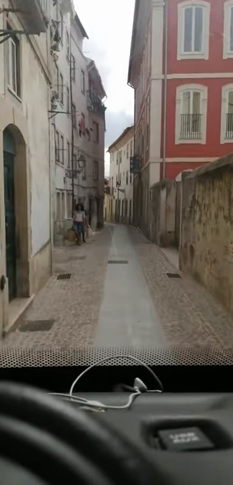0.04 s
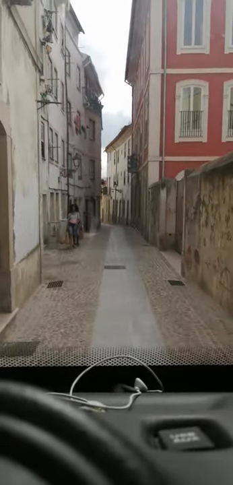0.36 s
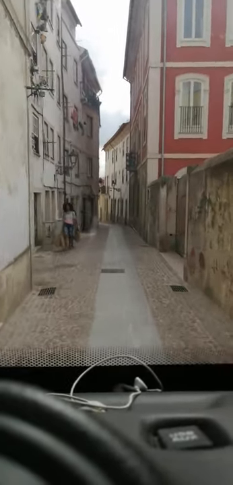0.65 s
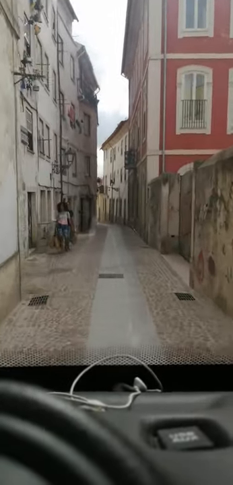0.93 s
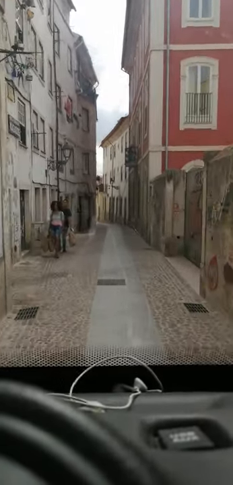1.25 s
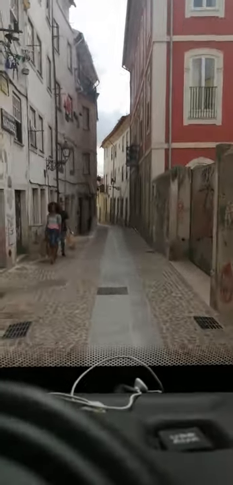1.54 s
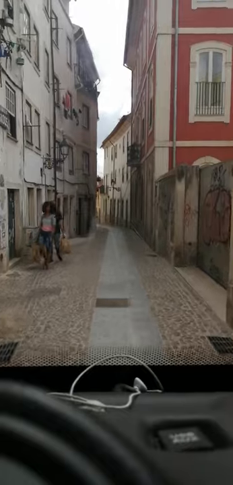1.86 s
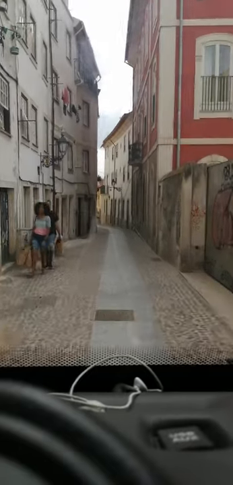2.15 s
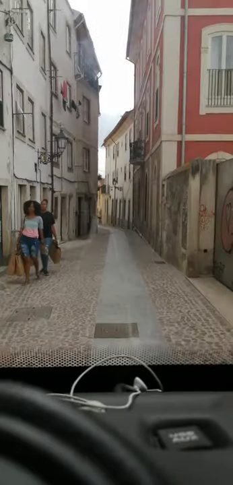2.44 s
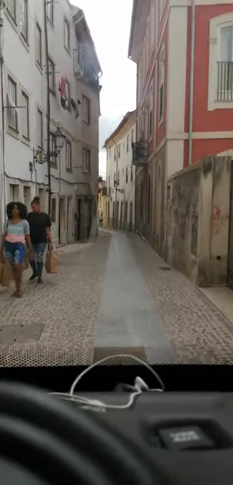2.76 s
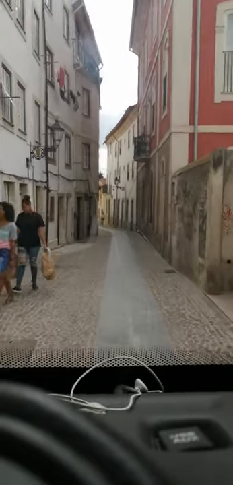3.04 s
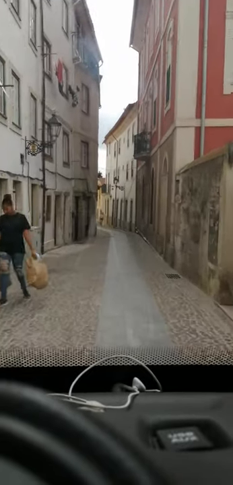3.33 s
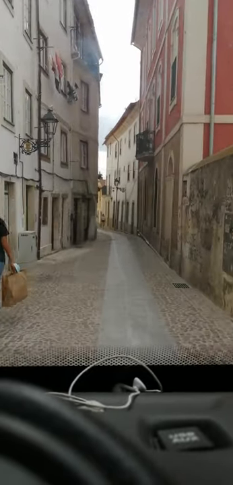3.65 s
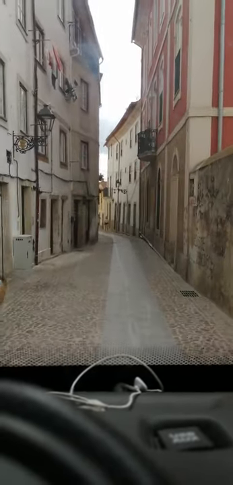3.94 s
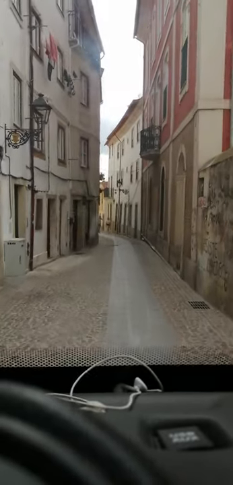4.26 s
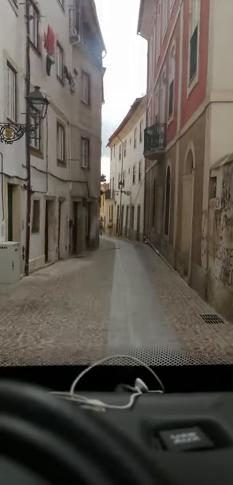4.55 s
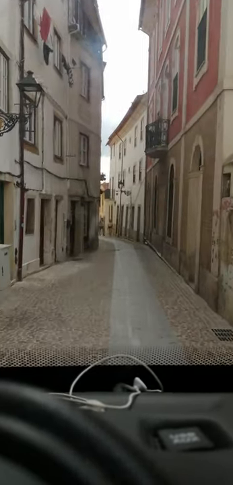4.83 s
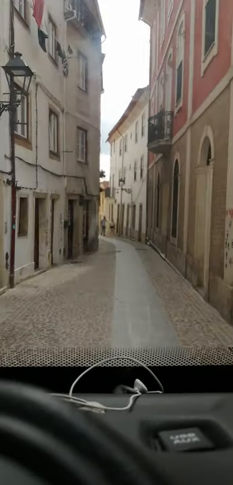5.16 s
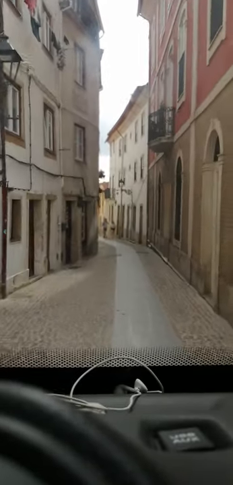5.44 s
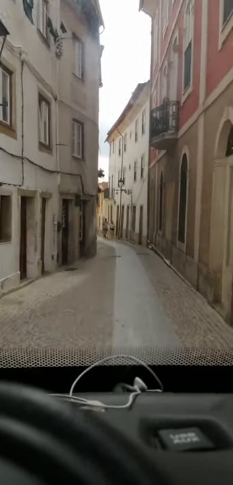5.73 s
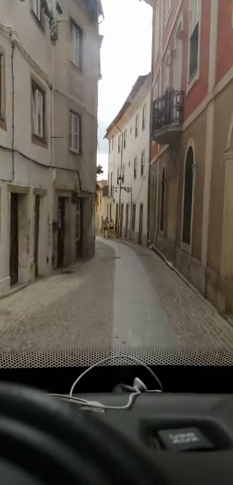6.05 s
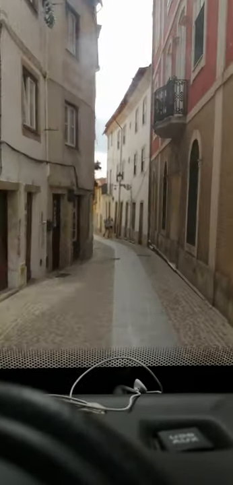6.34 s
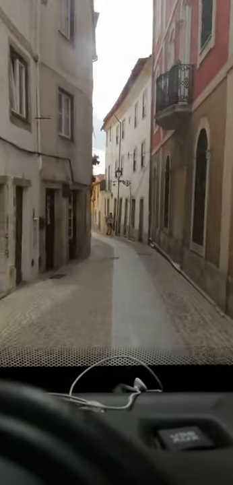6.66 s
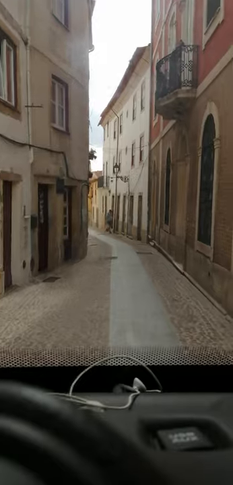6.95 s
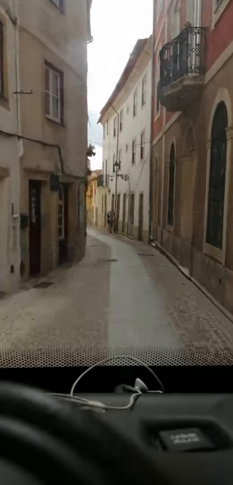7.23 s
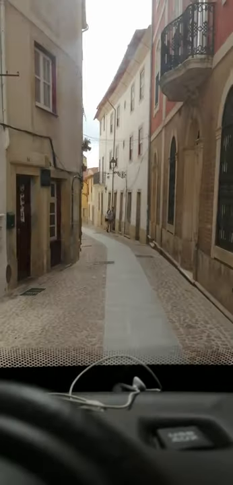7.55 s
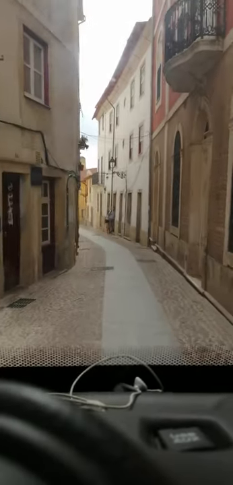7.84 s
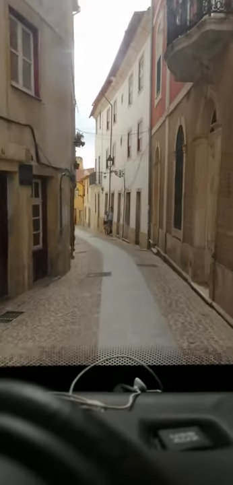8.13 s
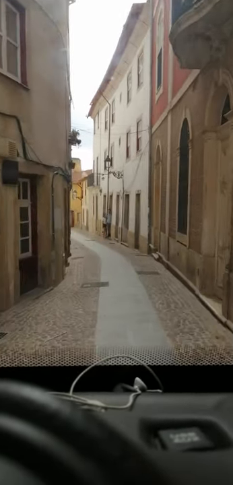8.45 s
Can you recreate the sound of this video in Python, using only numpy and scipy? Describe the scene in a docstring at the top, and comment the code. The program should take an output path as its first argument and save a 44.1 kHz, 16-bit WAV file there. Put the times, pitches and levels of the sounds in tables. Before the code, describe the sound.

Heard from the dashboard inside a small electric bus, cobblestones drone under the tyres and boom through the floor at a slow, steady pace. Close by, plastic panels click and rattle, harder with each jolt, and a little metal part clinks irregularly. A few short, high squeaks come before the middle, followed by a heavy low heave with a faint, thin scrape. The rattling carries on, with one more squeak late.

```python
"""Inside a small electric bus, rolling slowly over cobbles in a narrow lane.
The stones rock the body, boom in the floor and ring the cabin: a deep, uneven bed of rumble.
Over it a dry joint squeaks now and then, hard edges scrape and a small metal fitting jingles.
Up front, plastic trim knocks and each jolt sets the loose panels chattering."""
import sys
import numpy as np
from scipy import signal
from scipy.fft import rfft, irfft
from scipy.io import wavfile
from scipy.ndimage import uniform_filter1d, minimum_filter1d

SR = 44100
rng = np.random.default_rng(int(sys.argv[2]) if len(sys.argv) > 2 else 0)


def log_audio(samples):
    """Write samples as a 16-bit WAV file to the path given in sys.argv[1]."""
    # one column per channel
    frames = np.atleast_2d(samples).T
    # limit to full scale, then quantise
    limited = np.clip(frames, -1, 1)
    pcm = np.round(limited * 32767).astype(np.int16)
    wavfile.write(sys.argv[1], SR, pcm)


N = 374409
T = np.arange(N) / SR

# Roughness of the paving. Each row: time in seconds, relative level in dB.
ROAD = [(0.0, -35), (0.85, -36.5), (1.05, -34), (1.14, -41), (1.3, -35), (1.95, -35), (2.72, -37.5),
        (2.95, -34.5), (4.0, -38), (4.38, -36), (4.58, -40.5), (4.8, -33.5), (5.14, -36.5), (5.7, -40),
        (6.12, -45), (6.62, -37), (7.08, -39), (7.25, -34), (7.72, -35), (7.83, -36), (7.95, -33.5),
        (8.45, -38)]
# The cabin's low ring. Each row: time in seconds, level in dB.
CABIN_RING = [(0, -41), (0.17, -35.5), (0.38, -43.5), (0.65, -42), (0.85, -35), (1.03, -39.5), (1.2, -47),
              (1.5, -39), (1.85, -36), (2.1, -38), (2.3, -42), (2.47, -37), (2.65, -52), (2.87, -38),
              (3.3, -39), (3.55, -44), (3.75, -39.5), (4.08, -47.5), (4.4, -36.5), (4.6, -44.5),
              (4.87, -36.5), (5.12, -47.5), (5.3, -39), (5.55, -45), (5.85, -41), (6.15, -49), (6.3, -42.5),
              (6.85, -47), (7.05, -45), (7.25, -40.5), (7.65, -37), (7.85, -43.5), (8.03, -37.5),
              (8.2, -42), (8.45, -42.5)]
# Swells in the low end: the body heaving, the floor thudding, a hollow part thumping, a large panel
# ringing. Each row: crest in seconds, rise in seconds, level in dB.
BODY_HEAVES = [(0.05, 0.019, -15.5), (0.32, 0.14, -16), (0.96, 0.041, -16), (1.58, 0.033, -9.5),
               (2.37, 0.035, -15), (2.98, 0.011, -10), (3.33, 0.08, -16.5), (3.57, 0.054, -15),
               (3.87, 0.054, -12.5), (4.02, 0.01, -3.5), (4.3, 0.062, -13), (4.93, 0.016, -8),
               (5.55, 0.22, -18.5), (6.33, 0.47, -16.5), (6.63, 0.051, -16.5), (6.93, 0.069, -17),
               (7.92, 0.055, -14.5), (8.38, 0.08, -12.5)]
FLOOR_THUDS = [(0.13, 0.093, -23), (0.65, 0.078, -25), (2.52, 0.037, -27.5), (3.2, 0.05, -29),
               (4.0, 0.031, -27), (4.45, 0.026, -20.5), (4.58, 0.036, -21.5), (4.83, 0.11, -24.5),
               (5.2, 0.014, -26.5), (5.8, 0.032, -23), (6.15, 0.19, -27.5), (7.33, 0.032, -29),
               (7.55, 0.052, -24.5), (8.09, 0.04, -29)]
THUMPS = [(2.41, 0.062, -41.5), (2.83, 0.019, -31.5), (5.78, 0.022, -32.5)]
HOLLOW_SWELLS = [(0.23, 0.051, -37), (0.8, 0.035, -43), (1.56, 0.03, -38.5), (1.85, 0.035, -37),
                 (2.25, 0.021, -44.5), (2.48, 0.027, -41), (2.87, 0.047, -43), (3.35, 0.051, -38.5),
                 (3.73, 0.061, -44), (5.25, 0.051, -45), (7.2, 0.039, -42), (7.64, 0.049, -40.5),
                 (8.01, 0.05, -37.5)]
# Bumps under the wheels. Each row: crest in seconds, rise in seconds, panel shake and metal shake
# in relative dB.
BUMPS = [(0.02, 0.036, -50, -51), (0.23, 0.071, -42.5, -50), (0.39, 0.098, -46, -59),
         (0.6, 0.15, -54.5, -64), (0.82, 0.025, -44, -66), (1.01, 0.051, -49.5, -63),
         (1.41, 0.022, -45, -90), (1.585, 0.021, -42, -54.5), (1.74, 0.071, -51.5, -55.5),
         (1.905, 0.048, -43.5, -49), (2.25, 0.037, -49, -61.5), (2.475, 0.042, -45, -51),
         (2.65, 0.023, -47, -53), (2.89, 0.026, -40, -50.5), (2.97, 0.033, -42.5, -48.5),
         (3.09, 0.053, -42.5, -51.5), (3.3, 0.012, -36.5, -45.5), (3.4, 0.064, -42.5, -50),
         (3.465, 0.012, -51.5, -57), (3.55, 0.0074, -45, -50), (3.765, 0.09, -40.5, -52),
         (4.02, 0.051, -45.5, -51.5), (4.135, 0.038, -71, -50.5), (4.245, 0.013, -42.5, -54),
         (4.32, 0.03, -48, -59.5), (4.455, 0.029, -42, -54.5), (4.85, 0.039, -44.5, -60),
         (4.95, 0.05, -57, -64), (5.27, 0.07, -43, -74), (5.36, 0.038, -55, -51), (5.57, 0.091, -49, -59),
         (5.81, 0.14, -42.5, -52), (6.02, 0.052, -55, -73), (6.21, 0.065, -47, -61),
         (6.36, 0.12, -52.5, -61), (6.55, 0.039, -62, -55.5), (6.71, 0.078, -47, -53.5),
         (6.97, 0.046, -47, -59), (7.18, 0.053, -45.5, -53.5), (7.37, 0.15, -52, -60),
         (7.665, 0.044, -39, -46.5), (8.05, 0.076, -41, -50), (8.24, 0.039, -48.5, -62),
         (8.38, 0.044, -44, -56)]
# Thin scrapes. Each row: start in seconds, relative peak in dB.
SCRAPES = [(4.002, -48), (4.07, -60), (5.69, -58)]
# Squeaks of the joint. Each row: start and length in seconds, pitch in Hz, level in dB,
# overtone slope in dB per octave, roughness from 0 to 1.
SQUEAKS = [(2.681, .03, 1810, -38, -10, .72), (2.708, .075, 1790, -48.5, -8.5, .85),
           (3.06, .05, 1840, -44.5, -12, .55), (3.279, .032, 1780, -45, -13, .55),
           (7.32, .018, 2880, -40, -9, .85), (7.338, .05, 2880, -57, -4, .85)]
# Notes left ringing in the fitting. Each row: start in seconds, pitch in Hz, level in dB,
# seconds to fade by 60 dB.
PINGS = [(2.616, 4730, -56, .25), (3.555, 4375, -47, .07), (3.651, 4375, -51, .06), (8.212, 6024, -62, .45)]
# Clashes of the fitting. Each row: start in seconds, then ticks, low clink and high clink in relative dB.
CLASHES = [(0.361, -50.5, -65.5, -51), (2.417, -43.5, -43.5, -50), (2.614, -43, -47, -42.5),
           (2.777, -52.5, -46, -67), (2.836, -46.5, -54, -54), (3.108, -48.5, -54, -52),
           (3.287, -44, -45, -48), (3.46, -50.5, -51, -51), (3.554, -49, -43, -55),
           (3.649, -51, -40, -56.5), (3.8467, -49.5, -45, -59), (3.9694, -51, -61, -56),
           (4.13, -42.5, -44, -47), (4.4313, -51.5, -54, -59), (4.7815, -53, -52, -64),
           (5.346, -40, -40, -48), (5.5278, -42, -46, -47), (5.58, -45, -44, -49), (6.151, -48.5, -40, -60),
           (6.207, -60, -54, -58), (6.353, -46.5, -42.5, -49.5), (6.4732, -55, -53, -60),
           (6.675, -44.5, -41, -51), (6.996, -61, -52, -62), (7.1292, -50.5, -50, -57),
           (7.2739, -46, -49, -45), (7.384, -54, -57, -57), (7.5567, -41, -46, -49),
           (8.208, -38.5, -44, -43.5)]
# Knocks of the trim. Each row: start in seconds, push and hard edge in relative dB.
KNOCKS = [(0.087, -26.5, -43), (0.126, -36, -43.5), (0.218, -30, -40), (0.234, -31, -47),
          (0.257, -24.5, -39), (0.274, -27, -43), (0.501, -31, -58), (0.668, -33, -45), (0.717, -32, -52),
          (0.726, -32, -51), (0.844, -32, -53), (0.956, -30, -61), (0.973, -23, -40), (1.163, -34, -50),
          (1.201, -27.5, -44), (1.207, -39, -49.5), (1.253, -33, -57), (1.366, -30, -58), (1.519, -44, -43),
          (1.57, -24, -55), (1.588, -33, -40), (1.599, -26, -55), (1.611, -25, -51), (1.677, -28, -45),
          (1.724, -33, -45), (1.744, -39, -49), (1.777, -24, -47), (1.859, -20.5, -50), (1.92, -33, -37),
          (1.958, -35, -47), (2.21, -31, -64), (2.249, -31, -54), (2.264, -28, -47), (2.303, -29.5, -49),
          (2.375, -32, -51), (2.625, -31.5, -53), (2.7, -32, -59), (2.816, -27, -47), (2.831, -21.5, -37),
          (2.842, -21, -39), (2.861, -27, -53), (3.059, -41, -51), (3.164, -30.5, -46), (3.243, -32.5, -57),
          (3.394, -29, -49), (3.571, -27.5, -48), (3.75, -37, -44), (3.775, -27, -45), (3.784, -22.5, -39),
          (3.799, -33, -47), (4.11, -37, -43.5), (4.24, -32, -56), (4.263, -34, -57), (4.33, -30, -53),
          (4.588, -35, -62), (4.613, -44, -56), (4.679, -32, -63), (4.706, -27, -46.5), (4.817, -45, -46),
          (4.833, -36, -50), (4.858, -37, -52), (4.966, -34, -59), (5.021, -35, -67), (5.061, -36, -48),
          (5.103, -38, -57), (5.245, -30, -54), (5.262, -29, -46), (5.287, -48, -49), (5.327, -32, -52),
          (5.812, -31, -50), (5.954, -32, -49), (6.031, -36, -62), (6.231, -38, -57), (6.249, -36, -57),
          (6.574, -36, -60), (6.613, -29, -58), (6.63, -30, -53), (6.74, -37, -50), (6.96, -31, -64),
          (7.165, -31, -53), (7.181, -20.5, -40.5), (7.191, -30, -53), (7.198, -35, -57), (7.227, -25, -53),
          (7.279, -27.5, -60), (7.375, -37, -57), (7.422, -44, -54), (7.467, -32, -52), (7.507, -34, -45),
          (7.537, -27, -51), (7.559, -31, -46), (7.59, -32, -54), (7.779, -35, -51), (7.835, -29.5, -50),
          (7.863, -32, -49), (7.879, -31, -46), (7.907, -32, -58), (8.022, -34, -57), (8.153, -33, -53),
          (8.21, -31, -52), (8.399, -41, -58), (8.441, -42, -45)]
# Jolts that set the panels clattering. Each row: start in seconds, relative peak in dB.
JOLTS = [(0.171, -38), (0.705, -37), (1.774, -32.5), (1.815, -32), (1.862, -37.5), (2.469, -41),
         (2.941, -31.5), (3.042, -35), (3.243, -36), (3.345, -34.5), (3.393, -30), (3.686, -32),
         (3.738, -34), (4.814, -38.5), (5.807, -33.5), (6.276, -40.5), (7.184, -38), (7.466, -39.5),
         (7.615, -33), (7.969, -34), (8.021, -31.5), (8.067, -31.5)]

# The tone colour of each part. Each row: frequency in Hz, gain in dB.
BODY_EQ = [(10, -16), (20, 3.5), (29, -3.5), (40, 2), (47, -3.5), (56, -13), (70, -27), (105, -31),
           (300, -95.5), (3000, -130)]
FLOOR_EQ = [(35, -16.5), (55, -4), (69, 1.5), (82, -11), (105, -8.5), (120, -15), (138, -9), (175, -27.5),
            (300, -34), (3000, -110)]
TYRE_EQ = [(90, -20), (160, 4.5), (185, -1), (235, 2), (275, -5), (345, -11), (410, -13.5), (600, -15),
           (1200, -23), (3000, -38), (8000, -72), (14000, -99)]
SCRAPE_EQ = [(2500, -29), (3250, -2), (3900, -27), (5500, -12), (6200, 2.5), (7200, 0), (8300, -1.5),
             (8900, -18), (14000, -38)]
METAL_EQ = [(1200, -13), (2700, 3), (3400, 0.5), (4300, 0), (4950, -1.5), (5270, -7.5), (5650, -3),
            (6600, -6), (7400, -11.5), (8000, -11.5), (8600, -12.5), (9500, -17.5), (12000, -25.5),
            (15500, -37)]
TRIM_EQ = [(90, -10.5), (270, -7), (700, -5), (1100, 4), (1500, 2.5), (3500, -4.5), (4600, -6),
           (9000, -14.5), (15000, -26)]
PANEL_EQ = [(150, -14.5), (300, 6), (600, 1), (1000, -1), (1400, -3.5), (1550, -5), (2100, -5.5),
            (2350, -11.5), (3100, -12.5), (3500, -18.5), (4800, -18), (5400, -25), (8000, -37),
            (15000, -60.5)]
# The resonances of each part. Each row: pitch in Hz, bandwidth in Hz, gain in dB.
FLOOR_MODE = [(69.5, 3, 0)]
THUMP_MODE = [(222, 60, 0)]
HOLLOW_MODE = [(454, 26, 0)]
CABIN_MODES = [(319.5, 4, 0), (338, 3, 4.5), (349, 9, -4.5), (380, 22, -9.5)]
METAL_MODES = [(4385, 40, 0), (4883, 30, 2), (5635, 30, 4), (6024, 20, 4), (7000, 120, 0), (7442, 50, 5),
               (8480, 90, 0)]
PANEL_MODES = [(355, 14, 0), (457, 22, 7), (530, 14, 2), (678, 14, 0), (792, 16, -1), (992, 28, 2),
               (1105, 30, -1), (1204, 22, 3), (1423, 14, 12.5), (1940, 45, 0), (2540, 90, 1), (2885, 35, 0),
               (3015, 35, 1)]
LOW_CLINK_MODE, HIGH_CLINK_MODE = [(4250, 800, 0)], [(7400, 800, 0)]

USUAL_ROAD_DB, PANEL_SHAKE_DB = -37, -50  # ordinary paving, and the relative shake it gives the panels


def undb(db):
    """Decibels to gain."""
    return 10 ** (np.asarray(db) / 20)


def unit(x):
    """Scale to rms 1."""
    return x / np.sqrt(np.mean(x ** 2))


def add(out, start_s, sound):
    """Mix a short sound in at its cue."""
    part = out[max(int(start_s * SR), 0):][:len(sound)]
    part += sound[:len(part)]


def curve(rows):
    """A fader ride: straight lines between points of time and value."""
    return np.interp(T, *np.transpose(rows))


def lowpass(x, hz, order=2):
    """Roll off the treble."""
    return signal.lfilter(*signal.butter(order, hz, fs=SR), x)


def colour(x, eq, size=16384):
    """Minimum-phase EQ, so nothing rings ahead of an attack."""
    hz, db = np.transpose(eq)
    bins_hz = np.maximum(np.arange(N // 2 + 1) * SR / N, 1)
    gain = undb(np.interp(np.log(bins_hz), np.log(hz), db))
    cepstrum = irfft(np.log(gain), N)
    causal = np.r_[cepstrum[0], 2 * cepstrum[1:size // 2]]
    response = irfft(np.exp(rfft(causal, size)))
    return signal.fftconvolve(x, response[:size // 2])[:N]


def ring(x, modes):
    """Excite resonances side by side."""
    return sum(undb(db) * signal.lfilter(*signal.iirpeak(hz, hz / width, SR), x)
               for hz, width, db in modes)


def impacts(per_s, spread_db):
    """Chance contacts of uneven force and either sign."""
    hit, force = rng.random(N) < per_s / SR, rng.standard_normal(N)
    return unit(hit * np.sign(rng.standard_normal(N)) * undb(spread_db * np.clip(force, -2, 2)))


def steady(x, window_s):
    """Even out the slow swells of a texture, keeping its grain."""
    return x / np.sqrt(uniform_filter1d(x ** 2, int(window_s * SR)) + 1e-12)


def bursts(events, rise_s, fall_s, column=1):
    """Envelope that jumps at each event and dies away."""
    t, out = T[:SR // 2], np.zeros(N)
    shape = (1 - np.exp(-t / rise_s)) * np.exp(-t / fall_s)
    for row in events:
        add(out, row[0], undb(row[column]) * shape / shape.max())
    return out


def swells(events, column=2, fall_per_rise=1.4):
    """Envelope of bell-shaped swells that fade more slowly than they build; their powers add."""
    t, power = T[::100], 0
    for row in events:
        age = t - row[0]
        width = row[1] * np.where(age < 0, 1, fall_per_rise)
        power = power + undb(row[column]) ** 2 * np.exp(-(age / width) ** 2)
    return np.interp(T, t, np.sqrt(power))


def shake(steady_db, envelope, sensitivity):
    """How hard a part is shaken: by the paving (sensitivity in dB per dB) and by its own swells."""
    return np.hypot(undb(steady_db + sensitivity * (curve(ROAD) - USUAL_ROAD_DB)), envelope)


def cabin(x, wet_db, t60):
    """Direct sound plus the quick, dense echoes between glass and seats."""
    t = T[:SR // 3]
    tail = rng.standard_normal(len(t)) * np.exp(-np.log(1000) * t / t60) * (t > .002)
    return x + undb(wet_db) * signal.fftconvolve(x, tail / np.linalg.norm(tail))[:N]


def body_rock(level_db=-19):
    """The body rocks and heaves on its springs, down in the sub-bass."""
    sub = steady(colour(rng.standard_normal(N), BODY_EQ), 0.11)
    return sub * shake(level_db, swells(FLOOR_THUDS[:0] + BODY_HEAVES), sensitivity=0.79)


def floor_boom(level_db=-30):
    """Stone after stone booms in the floor, swelling into deep thuds."""
    boom = steady(colour(impacts(per_s=400, spread_db=0.5), FLOOR_EQ), 0.11)
    return boom * shake(level_db, swells(FLOOR_THUDS), sensitivity=1.0)


def cobble_drone(tyre_db=-39, hum_db=-34.5):
    """The stones drone in the tyres and ring the cabin air, a large panel, the floor and a hollow part."""
    stones = impacts(per_s=540, spread_db=1.0)
    tyre_shake = shake(tyre_db, undb(5) * swells(BUMPS), sensitivity=0.7)
    tyres = steady(colour(stones, TYRE_EQ), 0.091) * tyre_shake
    air = steady(colour(ring(stones, CABIN_MODES), TYRE_EQ), 0.27) * undb(curve(CABIN_RING))
    panel = steady(ring(ring(stones, HOLLOW_MODE), [(454, 100, 0)]), .12) * swells(HOLLOW_SWELLS)
    floor_hum = steady(ring(ring(stones, FLOOR_MODE), [(70, 25, 0)]), .4) * undb(hum_db)
    thumps = steady(ring(ring(stones, THUMP_MODE), THUMP_MODE), 0.091) * swells(THUMPS)
    return tyres + air + panel + floor_hum + thumps


def edge_scrapes():
    """Two hard edges slide briefly over each other: dense tiny slips, thin and high."""
    slips = impacts(per_s=4900, spread_db=0) * bursts(SCRAPES, rise_s=0.025, fall_s=0.028)
    return undb(6) * colour(slips, SCRAPE_EQ)


def joint_squeaks(sag=.035, waver=.009):
    """A joint sticks and slips: the pitch dips as it gives, and uneven slips roughen each overtone."""
    out = np.zeros(N)
    for start, length, hz, db, slope_db, rough in SQUEAKS:
        progress = T[:int(length * SR)] / length
        arch = np.sin(np.pi * np.sqrt(progress))
        slips = lowpass(rng.standard_normal((9, SR // 4)), 300)
        wobble, *rasp = unit(slips)[:, -len(progress):]
        pitch_hz = hz * (1 - sag * arch ** 4 + waver * wobble)
        phase = 2 * np.pi * np.cumsum(pitch_hz) / SR
        tone = 0
        for k in range(1, 5):
            pure = np.sin(k * phase)
            scratch = (rasp[2 * k - 2] * pure + rasp[2 * k - 1] * np.cos(k * phase)) / np.sqrt(2)
            tone += undb(slope_db * np.log2(k)) * (np.sqrt(1 - rough ** 2) * pure + rough * scratch)
        add(out, start, undb(db) * tone * arch)
    return cabin(lowpass(out, 8800, order=4), wet_db=-10, t60=.15)


def metal_pings(attack_s=.002):
    """A few clashes leave one note of the fitting ringing out."""
    t, out = T[:SR // 2], np.zeros(N)
    strike = np.minimum(t / attack_s, 1)
    for start, hz, db, t60 in PINGS:
        add(out, start, undb(db - 60 * t / t60) * strike * np.sin(2 * np.pi * hz * t))
    return out


def metal_clinks():
    """Each clash rings the fitting's two parts in its own blend; each ring is one broad resonance, low near 4.3
    kHz and high near 7.4 kHz."""
    low = impacts(per_s=4200, spread_db=1.5) * bursts(CLASHES, rise_s=0.003, fall_s=0.0063, column=2)
    high = impacts(per_s=4000, spread_db=3.0) * bursts(CLASHES, rise_s=0.0027, fall_s=0.0076, column=3)
    low_ring = ring(ring(low, LOW_CLINK_MODE), LOW_CLINK_MODE)
    high_ring = ring(ring(high, HIGH_CLINK_MODE), HIGH_CLINK_MODE)
    return undb(6) * cabin(low_ring + high_ring, wet_db=-6, t60=0.3)


def metal_jingle(bounce_s=0.062, bounce_db=-13):
    """Small metal parts clash in a cluster of ticks, bounce once and settle; shaking makes them fizz."""
    clash = bursts(CLASHES, rise_s=0.0043, fall_s=0.0091) * undb(0.5)
    rebounds = [(start + bounce_s, db) for start, db, *_ in CLASHES]
    bounce = bursts(rebounds, rise_s=0.003, fall_s=0.009) * undb(bounce_db)
    settle = bursts(CLASHES, rise_s=0.011, fall_s=0.07) * undb(-22.5)
    fizz = shake(-66.5, swells(BUMPS, column=3), sensitivity=1.6)
    hard = impacts(per_s=5200, spread_db=1.0) * (clash + bounce)
    light = impacts(per_s=2600, spread_db=1.0) * (settle + fizz)
    # light touches are duller; only hard ones make the metal ring
    metal = lowpass(light, 9500) + lowpass(hard, 10500) + ring(hard, METAL_MODES)
    return undb(3) * cabin(colour(metal, METAL_EQ), wet_db=-7.5, t60=0.16)


def trim_knocks(push_s=0.00032, edge_s=.00006, stray_s=0.00017, strays_per_s=6):
    """Plastic meets plastic: one very short push with a hard edge, then a faint ring of the panel."""
    t, pushes = T[:SR // 200] - .001, np.zeros(N)
    for start, push_db, edge_db in KNOCKS:
        push = undb(push_db) * np.exp(-.5 * (t / push_s) ** 2)
        edge = undb(edge_db + 6.5) * np.exp(-.5 * (t / edge_s) ** 2)
        add(pushes, start, push + edge)
    # lighter knocks fall by chance in between
    strays = (rng.random(N) < strays_per_s / SR) * rng.uniform(0.22, 1, N)
    strays *= undb(4) * shake(PANEL_SHAKE_DB, .5 * swells(BUMPS), sensitivity=1.6)
    pushes += signal.fftconvolve(strays, np.exp(-.5 * (t / stray_s) ** 2))[:N]
    knocks = undb(8.5) * colour(pushes, TRIM_EQ) + undb(0.5) * ring(pushes, PANEL_MODES)
    return cabin(knocks, wet_db=-4, t60=0.024)


def panel_chatter():
    """Loose panels tap all the time, harder with the shaking and in bursts after a jolt."""
    shaking = shake(PANEL_SHAKE_DB, swells(BUMPS), sensitivity=1.76)
    taps = steady(impacts(per_s=1050, spread_db=1.5), 0.07) * shaking * undb(-1.5)
    taps += impacts(per_s=2400, spread_db=3.0) * bursts(JOLTS, rise_s=0.0032, fall_s=0.021) * undb(-2.5)
    # light taps only tick; hard ones flex the whole panel and make it ring
    flex = np.minimum(shaking / np.percentile(shaking, 85), 1)
    ringing = ring(taps * flex, PANEL_MODES)
    ticks = cabin(taps, wet_db=-11, t60=0.04)
    return undb(9) * colour(ticks + ringing, PANEL_EQ)


def scene():
    """The mono mix, heard from behind the dashboard."""
    rumble = body_rock() + floor_boom() + cobble_drone()
    clatter = panel_chatter() + trim_knocks()
    fitting = metal_jingle() + metal_clinks() + metal_pings()
    return (rumble + clatter + fitting + edge_scrapes() + joint_squeaks())[None]


def record(dry, ceiling=.55, top_hz=15700):
    """A limiter holds down the biggest heaves of the bass; the top of the treble is cut."""
    hold = SR // 16
    gain = minimum_filter1d(ceiling / np.maximum(np.abs(dry), ceiling), hold)
    limited = dry * uniform_filter1d(gain, hold)
    return signal.sosfilt(signal.ellip(8, .2, 70, top_hz, fs=SR, output="sos"), limited)


dry = scene()
out = record(dry)
log_audio(out)
```